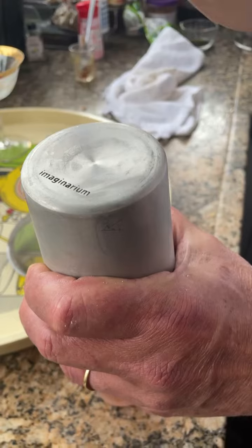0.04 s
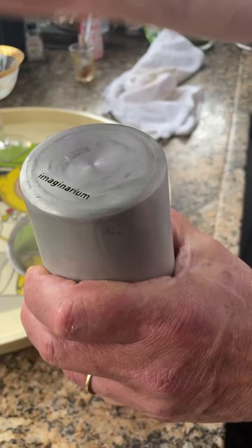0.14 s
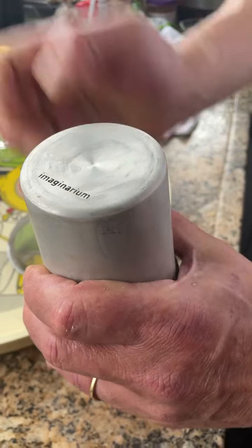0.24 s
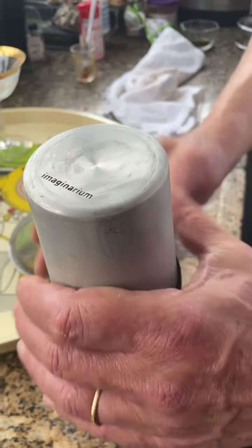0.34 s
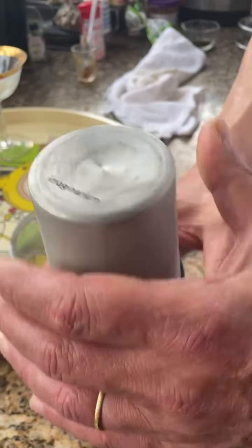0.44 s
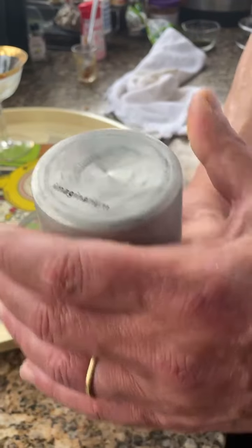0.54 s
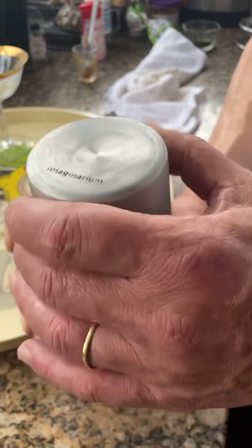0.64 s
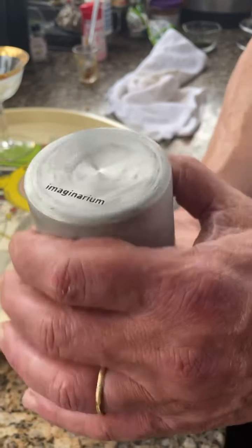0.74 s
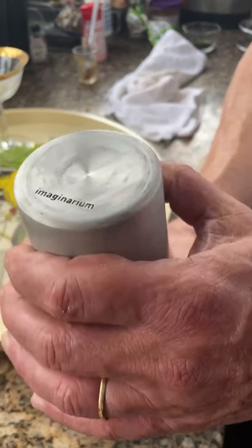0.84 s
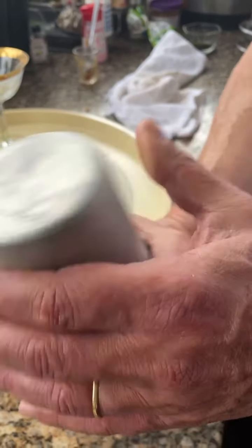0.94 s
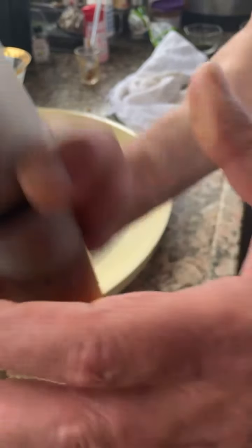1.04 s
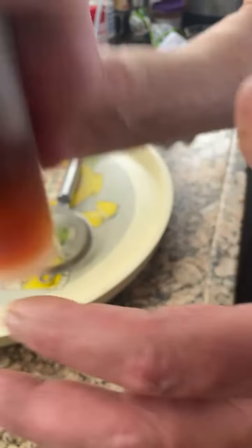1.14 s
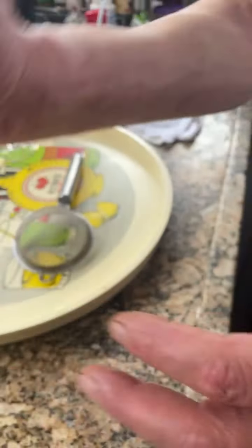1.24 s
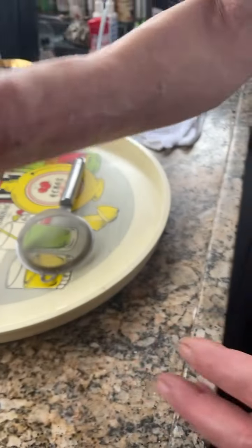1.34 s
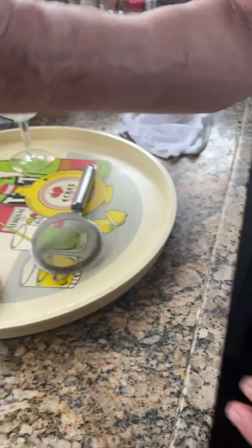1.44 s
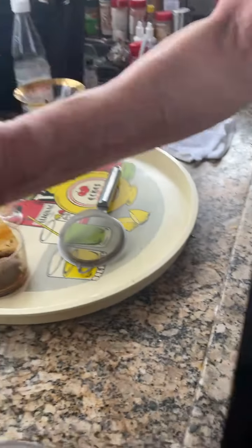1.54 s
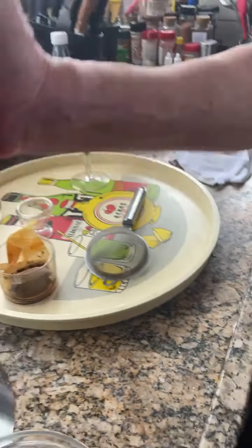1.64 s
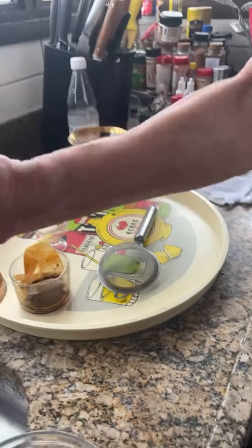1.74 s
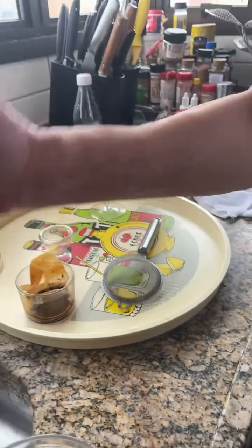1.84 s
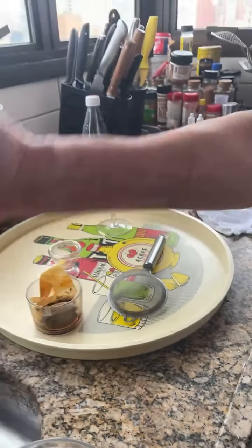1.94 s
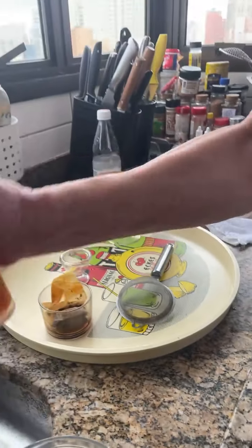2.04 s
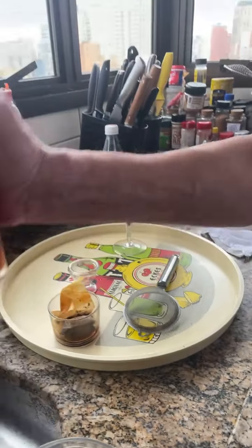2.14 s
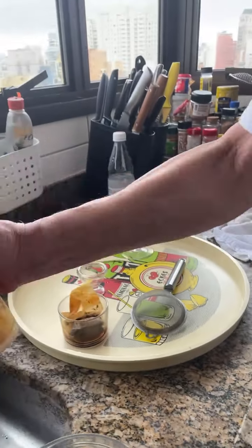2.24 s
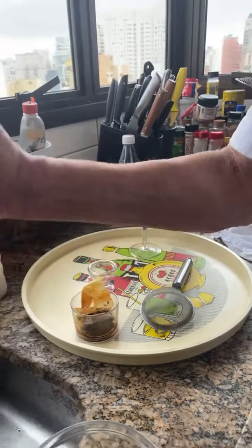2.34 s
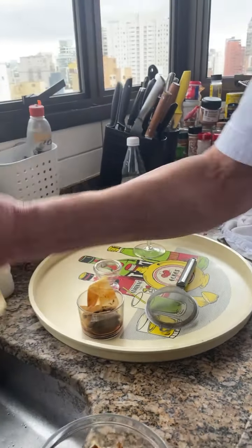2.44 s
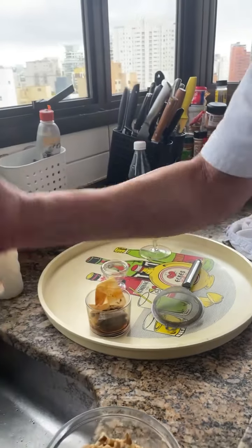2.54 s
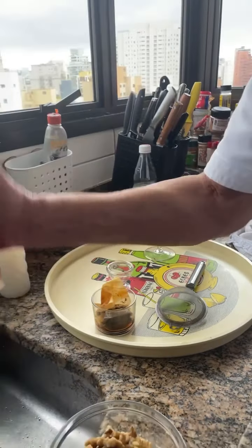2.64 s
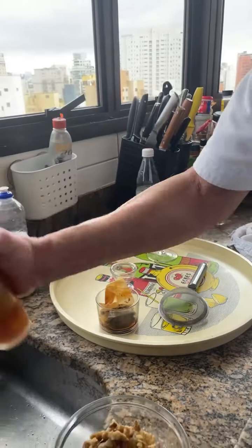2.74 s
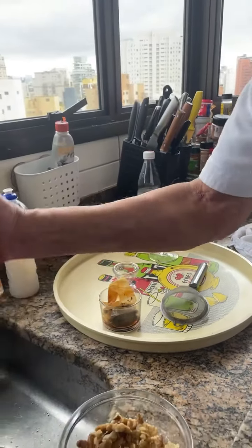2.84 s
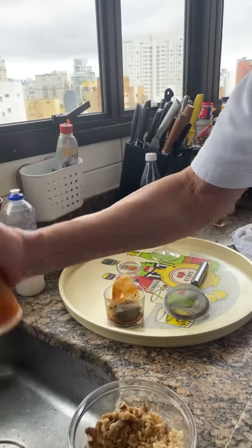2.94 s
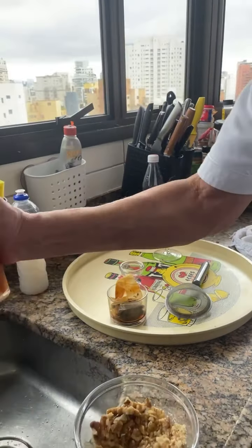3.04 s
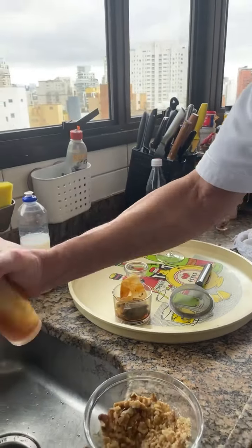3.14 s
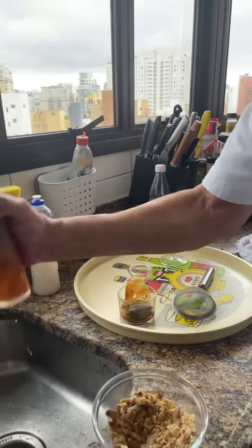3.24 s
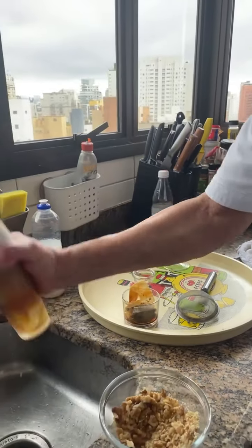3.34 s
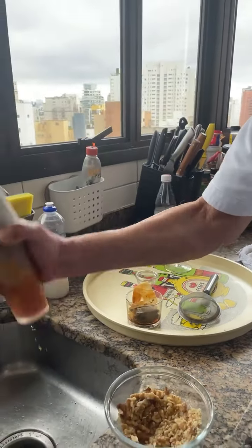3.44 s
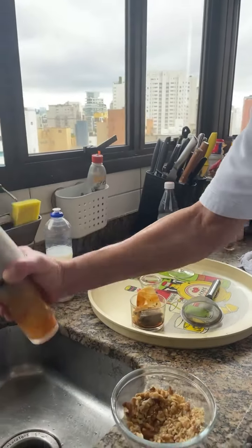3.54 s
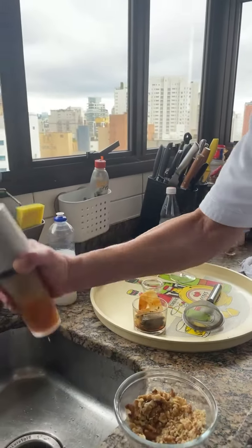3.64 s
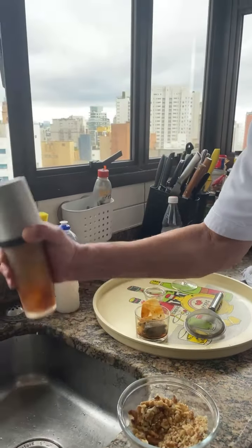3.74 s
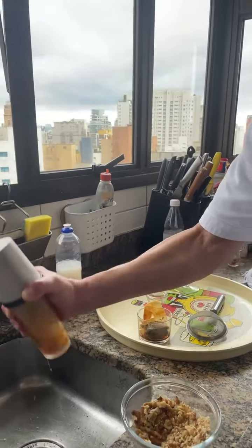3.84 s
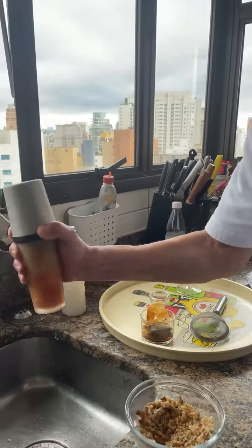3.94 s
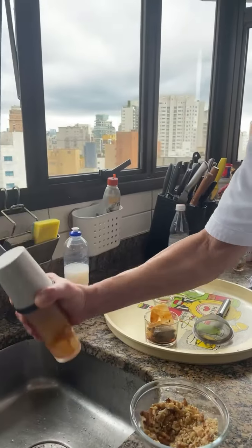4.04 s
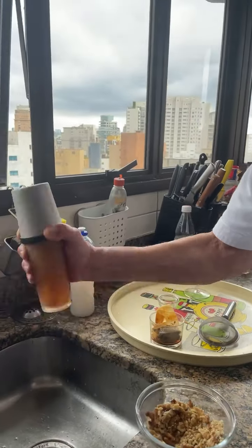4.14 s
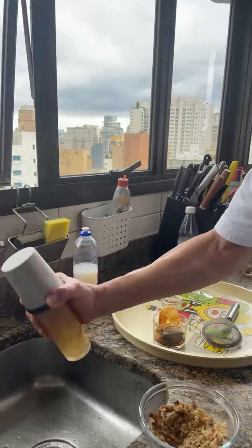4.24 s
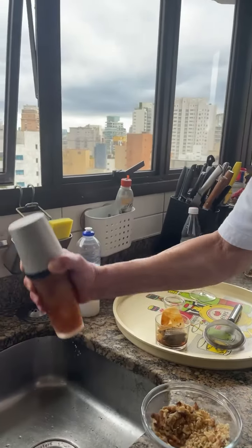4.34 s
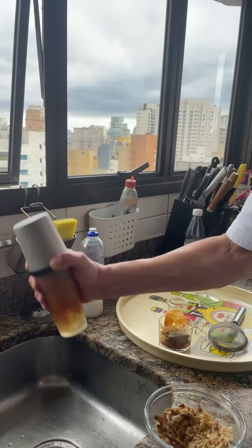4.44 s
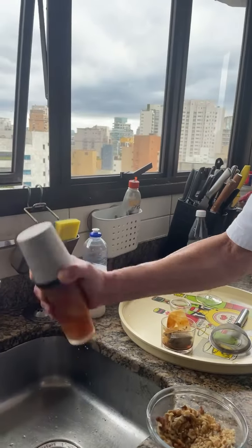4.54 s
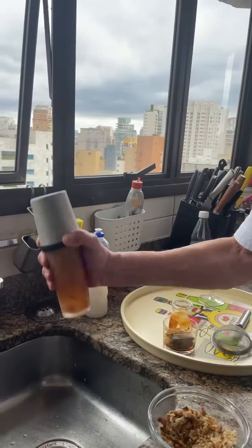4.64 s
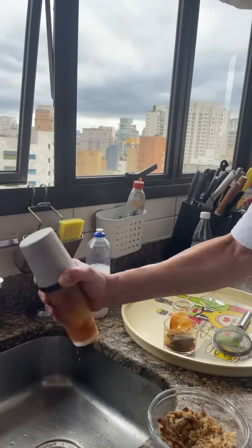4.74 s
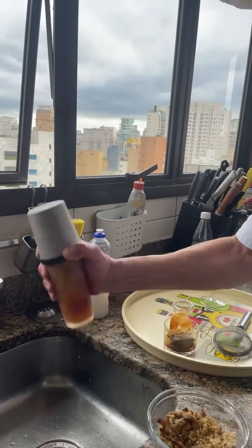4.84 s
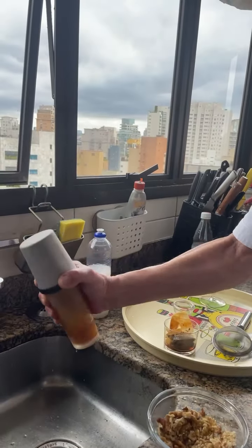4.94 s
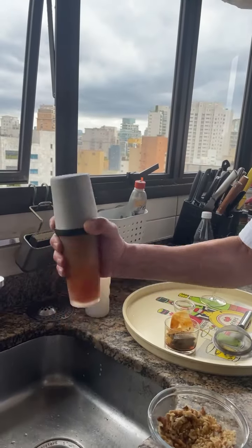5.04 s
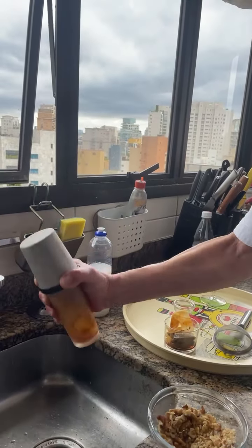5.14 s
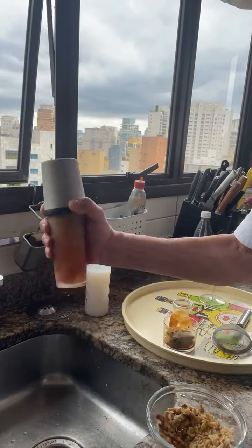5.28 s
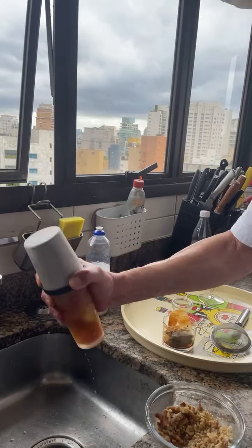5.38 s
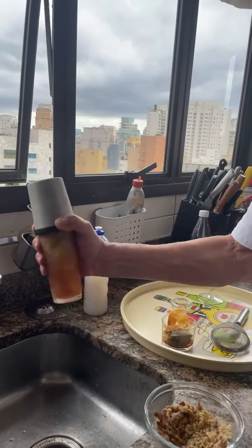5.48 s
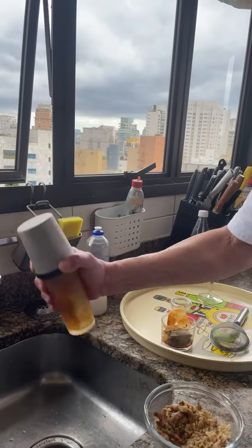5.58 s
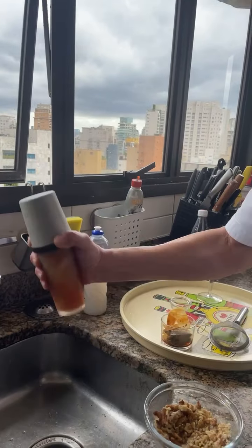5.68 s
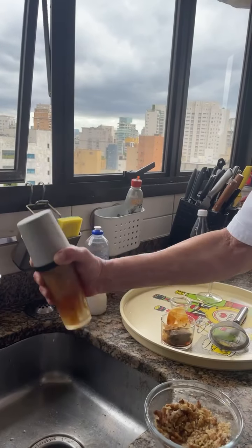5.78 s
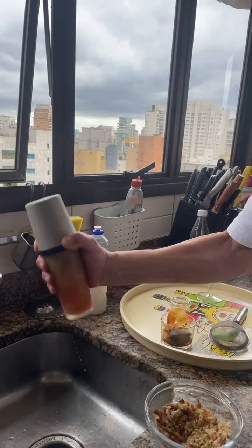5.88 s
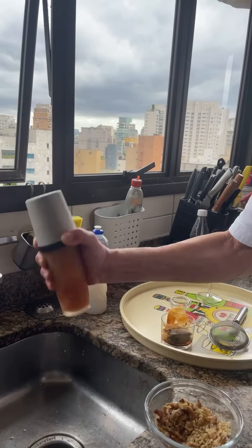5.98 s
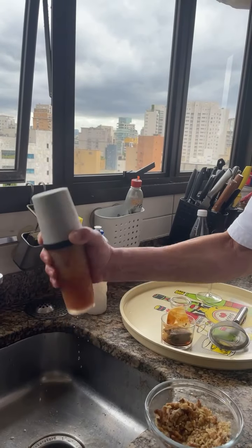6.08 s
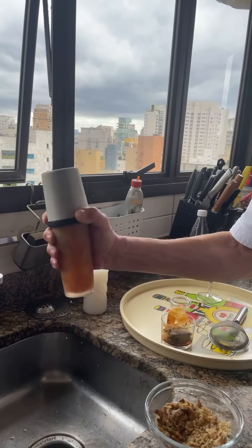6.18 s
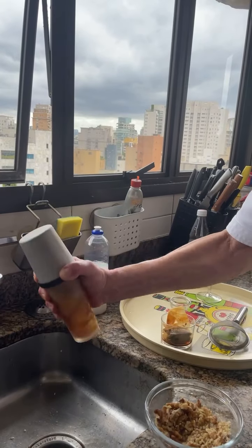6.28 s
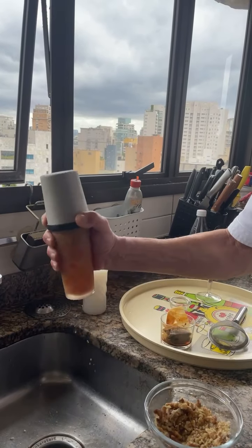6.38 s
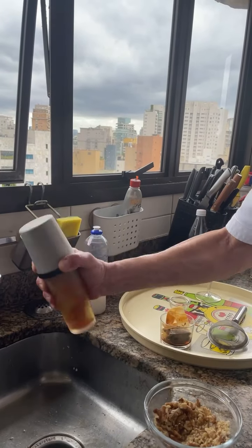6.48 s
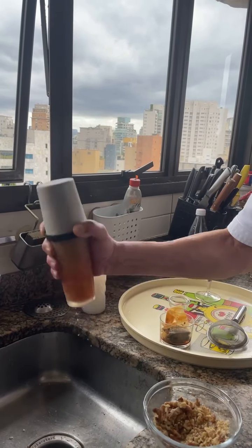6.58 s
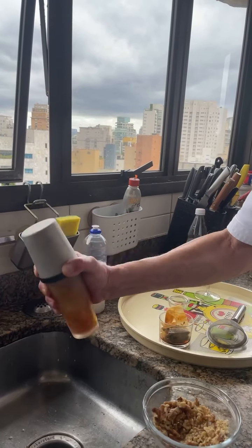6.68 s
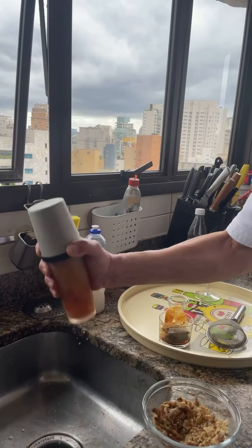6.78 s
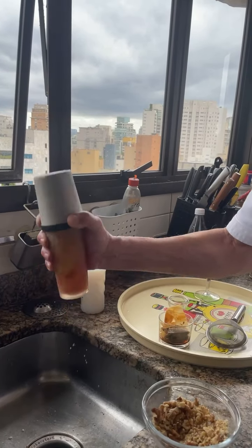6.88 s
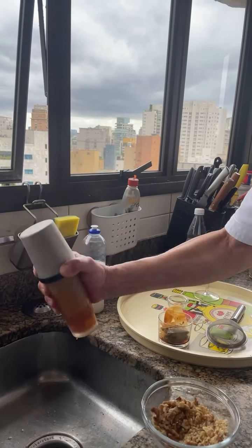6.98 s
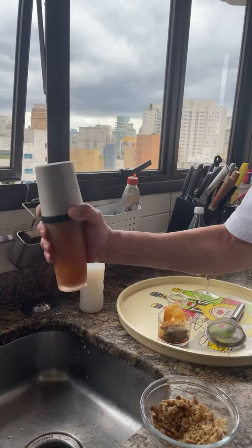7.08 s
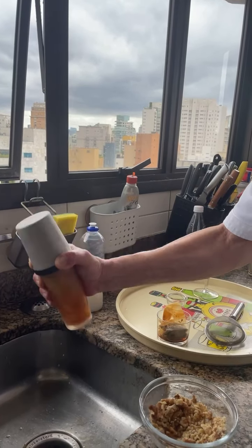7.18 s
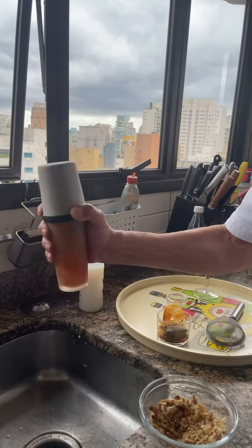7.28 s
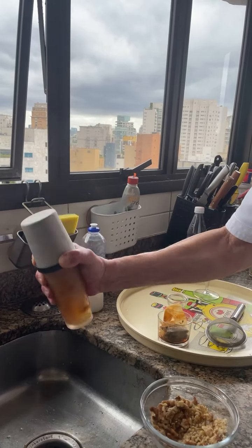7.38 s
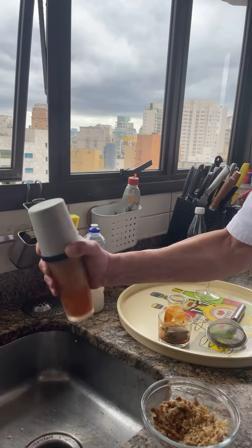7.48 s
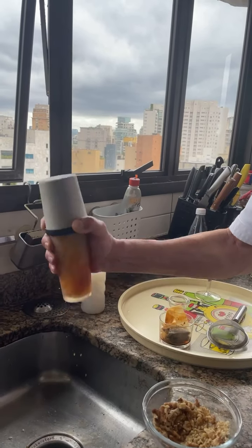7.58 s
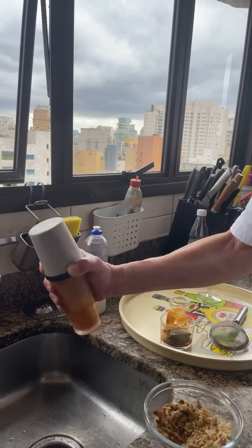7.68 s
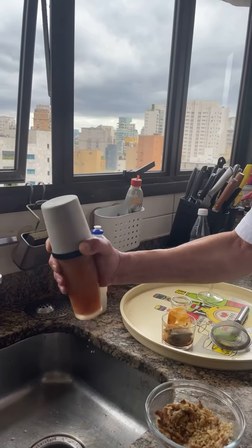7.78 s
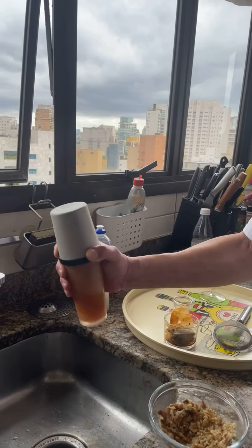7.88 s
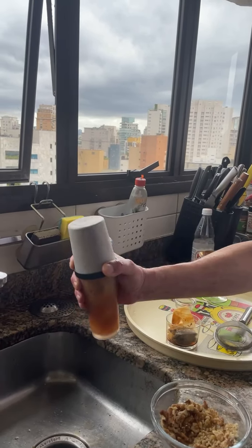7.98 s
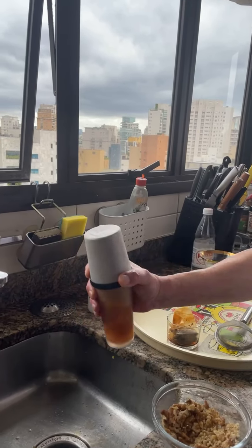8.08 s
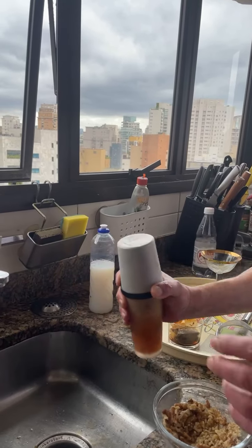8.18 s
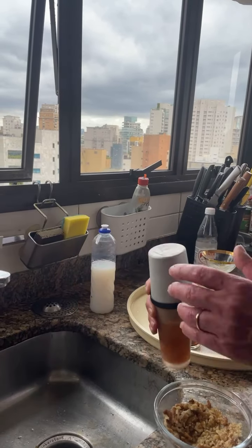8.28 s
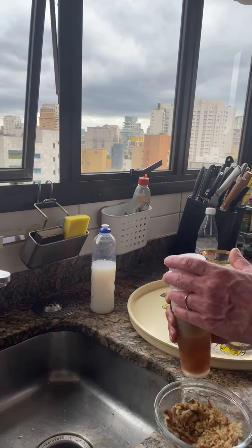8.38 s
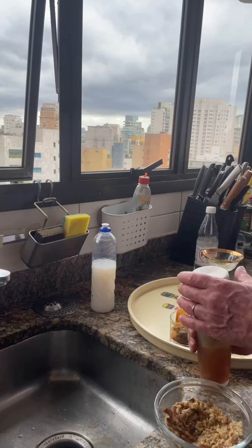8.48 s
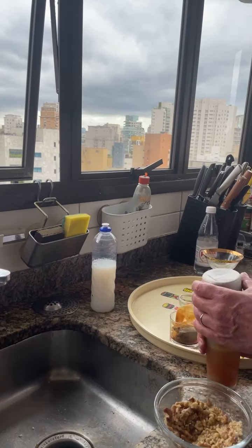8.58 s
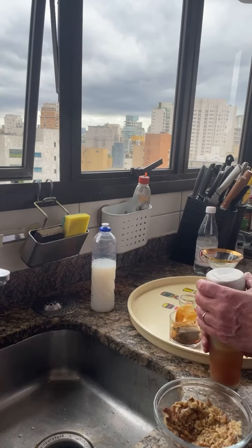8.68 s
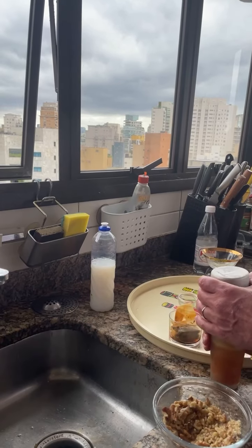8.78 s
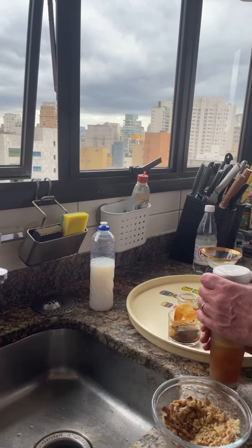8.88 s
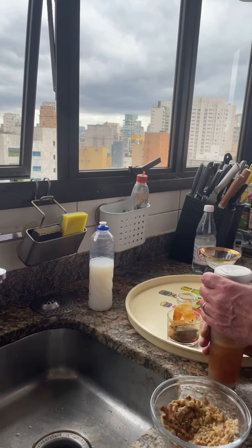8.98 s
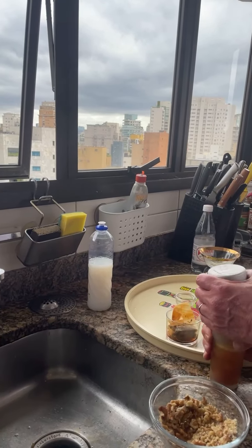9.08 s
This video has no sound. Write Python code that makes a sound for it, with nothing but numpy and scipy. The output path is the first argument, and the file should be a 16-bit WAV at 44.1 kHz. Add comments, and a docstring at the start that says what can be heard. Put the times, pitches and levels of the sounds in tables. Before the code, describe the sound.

Near microphone, lively kitchen echoes, low distant city hum. First a fading blow, soft hand knocks and thin high tinks on a metal and glass shaker. Then vigorous shaking for over six seconds: bright, clattering ice, wet splashes and little gurgles, surging about four or five times a second and varying in strength. Finally a few light scuffs, a hard set-down knock and hollow cup taps.

```python
"""First the ring of a blow dies away over town rumble from the window: a hard-walled kitchen, microphone near.
A two-part shaker (metal cup on a glass) is knocked shut by hand, shaken hard with ice and drink inside, then
set down on a stone counter. Ice lumps and small chips strike damped wall modes; noise drives the air that
glugs; knocks are short noise scuffs, taps and tinks struck resonances; decaying noise makes the echoes."""
import sys
import numpy as np
from scipy import signal
from scipy.fft import rfft, irfft
from scipy.io import wavfile

SR = 44100
rng = np.random.default_rng(int(sys.argv[2]) if len(sys.argv) > 2 else 0)


def transcribe(u):
    """Save the signal u as a 16-bit wav file named by the first command-line argument.

    u: samples, shape (n,) or (channels, n), limited to [-1, 1]; the rate is SR.
    q: integer samples, one column per channel.
    """
    v = np.clip(np.atleast_2d(u).T, -1, 1)
    q = np.round(v * 32767).astype(np.int16)
    wavfile.write(sys.argv[1], SR, q)


N = 402191

# Colour of the town through the window: [f/Hz, relative level per Hz/dB]
TOWN_COLOUR = [(15, -33), (25, -16), (53, -10.5), (82, -4), (130, -6), (242, -13), (263, -10), (516, -19),
               (680, -23), (911, -22), (1260, -27.5), (5880, -45), (6920, -47), (16000, -60)]
TOWN_DB = -46
HUM_HZ, HUM_DB = 57.3, -48.5

# Modes still ringing from the blow just before the start: [f/Hz, level/dB, t60/s]
BLOW_MODES = [(44.6, -25.5, 0.53), (221, -39, 0.97), (324, -43, 0.45), (617, -45, 0.35), (2330, -36, 0.39),
              (3580, -48, 0.47), (4010, -51, 0.49), (4930, -53, 0.35), (6700, -54, 0.25), (8500, -48, 0.32)]

# Glugs of the drink: [t of the peak/s, level/dB, hold at full level/s]
DRINK_GLUGS = [(.57, -43, .02), (.9, -50, .01), (1.34, -47, .03), (1.53, -44, 0.011), (1.78, -42.5, 0.017),
               (1.99, -46.5, 0.048), (2.47, -48, 0.018), (2.9, -48, 0.081), (3.3, -46.5, .05),
               (3.41, -42, .01), (4.31, -45, 0.024), (4.47, -43.5, 0.033), (4.72, -39.5, 0.056),
               (4.95, -40.5, 0.014), (5.62, -49, 0.092), (5.83, -44.5, 0.053), (6.05, -48, 0.086),
               (6.27, -42, 0.045), (6.52, -39, 0.02), (7.69, -48, .02)]
GLUG_RISE_DB_PER_S, GLUG_FALL_DB_PER_S = 286, 140

# Faint thin rings of glass or metal: [t/s, level/dB, f/Hz, t60/s]
THIN_RINGS = [(.245, -51, 8330, 0.044), (.255, -50, 3240, .1), (.525, -38.5, 3270, 0.14),
              (0.889, -39, 3260, 0.1), (0.914, -33, 3280, 0.053), (8.34, -47, 4500, 0.12)]

# Hollow taps on the air in the cup: [t/s, relative level/dB, f/Hz]
CUP_TAPS = [(8.018, -30, 377), (8.326, -27.5, 370), (8.676, -19.5, 381), (8.99, -21.5, 370),
            (9.044, -20.5, 418)]

# Hand, tray and counter knocks: [t/s, relative level/dB, low edge f/Hz, dull edge f/Hz, decay to 1/e/s]
CONTACT_KNOCKS = [(0, -32.5, 300, 3400, 0.057), (0.52, -40, 300, 3000, 0.021),
                  (0.544, -27, 280, 1800, 0.029), (0.655, -34, 250, 870, 0.035),
                  (0.88, -36, 300, 1480, 0.042), (.95, -39, 2400, 8900, 0.0024),
                  (.975, -32, 2000, 4900, 0.0079), (7.949, -34.5, 1800, 3200, 0.026),
                  (8.171, -35.5, 1510, 2830, 0.018), (8.412, -33, 1700, 3500, 0.016),
                  (8.533, -9.5, 740, 2570, 0.036), (8.533, -36, 2300, 4900, 0.0072),
                  (8.536, -51, 5000, 14100, 0.0037), (8.547, -26, 910, 3500, 0.0015),
                  (8.536, -21, 89.5, 460, 0.03), (9.028, -21.5, 140, 420, 0.036),
                  (9.039, -29, 485, 2040, 0.052)]
# Modes set ringing by the knocks: [f/Hz, relative level/dB, t60/s]
KNOCKED_MODES = [(588, -6.5, 0.22), (1290, -3, 0.037), (1750, -17, 0.064), (2150, -2, 0.034),
                 (3150, -5, 0.047), (4500, -14, .05)]

# Colour of the loaded shaker walls: [f/Hz, relative level per Hz/dB]
WALL_COLOUR = [(240, -48), (400, -11), (570, -29.5), (935, -18), (1420, -11), (1730, -1), (2250, 2),
               (3070, -0.5), (4880, 0), (5690, -4), (8240, -7), (9760, -22.5), (12700, -28), (14500, -25.5),
               (16000, -8)]
# The few wall modes that stand out: [f/Hz, relative level/dB, t60/s]
WALL_RINGS = [(1800, -9, 0.033), (2266, -16, 0.064), (2640, -5.5, 0.054), (3016, 4.5, 0.025),
              (3190, -9.5, 0.09), (3620, 5, 0.0094), (3950, -3.5, 0.063), (4230, -8.5, 0.058)]

# Turns of the stroke that set chips and drink sliding:
# [t/s, rattle level/dB, swell/s, weight below 1.5 kHz re rattle/dB, spray level above 9 kHz/dB]
STROKE_TURNS = [(1.258, -38, .02, -9, -52), (1.525, -23.5, 0.023, -30, -33), (1.705, -36, 0.024, -20, -30),
                (1.745, -25.5, 0.053, -14, -41), (1.91, -23.5, 0.038, -18, -19.5),
                (1.985, -25, 0.057, -13, -34), (2.108, -25, 0.17, -15, -20),
                (2.256, -22.5, 0.022, -17, -28), (2.393, -24.5, .1, -16, -25),
                (2.678, -29, 0.077, -11, -39), (2.85, -25.5, 0.1, -9.5, -25), (3.06, -30, 0.16, -10.5, -28),
                (3.28, -31, 0.033, -12, -43), (3.335, -33, 0.022, -8, -37), (3.367, -27.5, 0.05, -11, -38),
                (3.588, -24.5, 0.028, -11.5, -27), (3.668, -30.5, 0.042, -14, -30),
                (3.774, -25, .03, -13, -40), (3.82, -24, 0.027, -11, -29), (3.95, -33, 0.049, -12, -48),
                (3.998, -25, 0.11, -12.5, -26.5), (4.17, -30.5, 0.048, -11, -32),
                (4.213, -25, 0.11, -8.5, -27), (4.285, -26, 0.054, -15, -34), (4.45, -31.5, 0.11, -14, -30),
                (4.59, -33, 0.066, -13, -30), (4.667, -28, 0.097, -9.5, -37), (4.93, -29, 0.035, -7, -32),
                (5.015, -30, 0.075, -20, -52), (5.088, -27, 0.023, -27, -36),
                (5.134, -20, 0.026, -15.5, -32), (5.285, -25, 0.14, -13.5, -26),
                (5.51, -32, 0.03, -12, -38), (5.599, -25.5, 0.059, -16.5, -36),
                (5.76, -30, 0.099, -13.5, -42), (5.845, -32.5, 0.045, -20, -34),
                (5.955, -34.5, 0.044, -14, -36), (6.041, -24, 0.017, -13.5, -40),
                (6.188, -34.5, .03, -18, -43), (6.257, -24.5, 0.039, -14.5, -34),
                (6.46, -38.5, 0.018, 0, -39), (6.5, -28.5, 0.044, -13, -42), (6.68, -28.5, 0.094, -13, -41),
                (6.845, -40, .02, -14, -41), (6.931, -29.5, 0.077, -17, -37), (7.11, -38, 0.019, -22, -40),
                (7.162, -28.5, 0.08, -11.5, -36), (7.275, -29.5, 0.027, -15, -30),
                (7.347, -25, 0.09, -11.5, -42), (7.45, -29, 0.044, -17, -34),
                (7.556, -23.5, 0.045, -16, -32), (7.64, -24, 0.048, -18, -44), (7.9, -54, .01, -18, -48)]
# After a turn: jump, swell, die away; left alone, the contents settle ever faster
RISE_S, SWELL_DB, FALL_DB_PER_S, SPRAY_FALL_DB_PER_S = 0.03, 4, 105, 92
SETTLE_DB_PER_S2 = 124
LEAD_S = 0.015   # small chips start ahead of the turn's listed time
USUAL_HZ, FOLLOW = 3300, 0.41   # the rattle leans from its usual pitch towards that of the last crash

# Contents shifting while the shaker is only held:
# [t/s, level/dB, weight below 1.5 kHz re level/dB, edge above 9 kHz re level/dB, brightest f/Hz]
HELD_SHIFTS = [(.2, -63.5, -7, -4, 3000), (.45, -67, -2, -14, 2400), (.56, -54, -5, -7, 3000),
               (.77, -44.5, -35, -7, 4000), (1.12, -61.5, -1, -17, 2460), (1.24, -52, -12, -8, 4000),
               (1.45, -47.5, -8.5, -12, 3800), (7.85, -40, -14, -22, 3300), (8.0, -57.5, 0, -12, 2300),
               (8.22, -54.5, -6, -16, 2000), (8.35, -51.5, -3.5, -6, 3800), (8.5, -52.5, -9, -12, 2000),
               (8.56, -50, -1, -30, 2000), (8.75, -52, -9, -30, 2230), (8.95, -60.5, 3, -15, 2420),
               (9.07, -52, 4, -20, 1950)]

# Ice crashes: [t/s, relative level/dB, brightest f/Hz, weight below 1.5 kHz/dB, edge above 9 kHz/dB,
# lead of the first lump/dB]
ICE_CRASHES = [(1.2374, -28, 4500, -24, -31, 2), (1.252, -26, 4100, -30, -27, 6),
               (1.2586, -16.5, 4200, -40, -24, 19), (1.2735, -13.5, 4600, -19.5, -41, 9),
               (1.3495, -18, 2150, -15, -54, -3), (1.384, -18.5, 3860, -24, -52, 26),
               (1.4245, -25.5, 4270, -13, -18, 11), (1.4664, -18, 4750, -32, -25, 24),
               (1.4848, -24, 4910, -8, -19, 2), (1.5122, -10, 4960, -30, -26, 9),
               (1.5291, 2, 4680, -20.5, -26.5, 9), (1.7266, -19, 4640, -24, -32, 11),
               (1.741, -14.5, 4700, -20, -28, 6), (1.7493, -5.5, 4860, -31, -24, 5),
               (1.777, -7, 4180, -5, -24, 13), (1.8333, -16, 4200, -12, -25, -4),
               (1.8982, -15.5, 4240, -27, -31, 6), (1.9127, -5, 3200, -48, -17.5, -20),
               (1.9557, -10, 2880, -17, -26, -2), (1.986, -8, 5170, -6, -19, 3),
               (2.016, -7.5, 3930, -13, -21.5, -8), (2.0712, -10.5, 3800, -27, -34, 8),
               (2.0845, -8.5, 4940, -36, -22, -6), (2.1088, -2.5, 4240, -40, -19.5, -5),
               (2.1771, -4.5, 3160, -21, -30, 3), (2.2579, -3, 3950, -18.5, -27, -6),
               (2.3941, -2.5, 2850, -22, -18.5, 8), (2.4477, -6.5, 3730, -21, -19.5, -6),
               (2.5042, -7.5, 2960, -17.5, -38, 7), (2.609, -18.5, 3000, -31, -24, -2),
               (2.6755, -29, 2960, -8, -12, 10), (2.7, -15.5, 3980, -19, -19, 8),
               (2.7266, -15, 3800, -9, -17, 17), (2.7987, -18.5, 3580, -24, -39, 6),
               (2.8303, -11.5, 3570, -19, -39, 13), (2.8497, -16, 4170, -7, -10.5, -3),
               (2.876, -8.5, 3060, -34, -38.5, 3), (2.9728, -14, 3070, -9, -38, 4),
               (3.0832, -5, 3340, -27, -26, 15.5), (3.1437, -17.5, 3820, -8, -14.5, 10),
               (3.2815, -13.5, 3750, -19, -18.5, 6), (3.34, -19.5, 3260, -28, -18, -2),
               (3.368, -4, 3400, -19.5, -32, -4), (3.505, -13.5, 3700, -21, -36, -6),
               (3.5883, -12.5, 3700, -15, -40, 8), (3.6691, -6, 3940, -57, -38, 20),
               (3.775, -8.5, 2950, -32, -31, 4), (3.8204, -7.5, 3360, -32, -24.5, 1),
               (3.9533, -18.5, 2720, -15, -36, -3), (3.998, -3.5, 2700, -20.5, -34, 8.5),
               (4.217, -11.5, 2950, -3, -24, 3), (4.285, -6.5, 2850, -22, -34, 5),
               (4.307, -13, 5530, -30, -20.5, 10), (4.451, -29, 2900, -26, -4, 4),
               (4.513, -14.5, 3300, -14, -22, -1), (4.591, -24, 4000, -26, -10.5, -2),
               (4.627, -14.5, 2950, -23, -23, 0), (4.6678, -10.5, 2900, -7, -20.5, 1),
               (4.7035, -13, 3190, -23, -27, 8), (4.728, -11, 3900, -28, -27, 7),
               (4.818, -16, 3920, -36, -22, -1), (4.866, -15.5, 3840, -17, -21, 4),
               (4.9298, -12.5, 3620, 4, -23, 7), (5.015, -11.5, 3300, -36, -41, -1),
               (5.091, -3, 3300, -64, -30, 9), (5.29, -8, 3020, -46, -16.5, -1),
               (5.3994, -14, 3700, -22, -21, 6), (5.6127, -15.5, 3520, -30, -27, 9),
               (5.76, -20, 2140, -30, -41, 8), (5.7864, -22.5, 3050, -10, -40.5, 2),
               (5.8667, -17.5, 4230, -13, -22, 13), (5.959, -18.5, 2100, -17, -33, 1),
               (6.0292, -22.5, 3030, -17, -18, 8), (6.0457, -5, 5530, -19.5, -25, -3),
               (6.1891, -14, 3000, -27, -25, -5), (6.2572, -11, 3040, -26, -29, -1),
               (6.284, -11, 3660, -28, -36, 3), (6.5094, -13.5, 1740, -35, -26, 5),
               (6.563, -15, 3770, -32, -56, -1), (6.646, -22, 4080, -24, -22, 2),
               (6.6836, -19.5, 1960, -34, -39, 16), (6.7337, -12.5, 3960, -17, -23, 9),
               (6.759, -13.5, 3970, -17, -15.5, 4), (6.933, -25.5, 3030, -30, -34, -6),
               (6.954, -16.5, 2380, -5, -24, 0), (7.008, -15.5, 4700, -19, -22, 5),
               (7.1644, -20, 3220, -27, -40, 5), (7.279, -16.5, 3950, -33, -18, -3),
               (7.3494, 1, 3220, -17, -29, 15.5), (7.5588, -0.5, 3740, -41, -22.5, 12),
               (7.6415, -7.5, 4100, -23, -21, -5), (7.6943, -6.5, 3910, -29, -24, -8)]
USUAL_WEIGHT_DB, USUAL_EDGE_DB = -34.5, -33.5   # references for the weight and edge columns

# Decay of the kitchen: [f/Hz, t60/s]
KITCHEN_DECAY = [(200, 0.66), (1500, 0.46), (4000, 0.51), (9000, 0.4), (16000, 0.61)]
STROKES_PER_S = 2.2
CUTOFF_HZ = 15980


def amp(db):
    """Convert dB to gain."""
    return 10 ** (np.asarray(db) / 20)


def rms_one(x):
    """Scale to rms 1."""
    return x / np.sqrt(np.mean(x ** 2) + 1e-20)


def in_time(rows):
    """Interpolate the columns of a time table at every sample."""
    s, *columns = np.transpose(rows)
    return [np.interp(np.arange(N) / SR, s, column) for column in columns]


def at_hz(points, hz):
    """Read a table on a log-frequency axis."""
    table_hz, value = np.transpose(points)
    return np.interp(np.log(np.maximum(hz, 1)), np.log(table_hz), value)


def ring(clicks, hz, t60):
    """A damped mode: a unit click starts a sine whose envelope begins at 1 and falls 60 dB in t60."""
    r, w = amp(-60 / (t60 * SR)), 2 * np.pi * hz / SR
    tiny = 1e-18   # keeps the filter clear of denormal numbers
    return signal.lfilter([0, np.sin(w)], [1, -2 * r * np.cos(w), r * r], clicks + tiny)


def town():
    """Distant town: steady coloured noise, rumble and hiss, with a faint mains hum."""
    colour = amp(at_hz(TOWN_COLOUR, np.fft.rfftfreq(N, 1 / SR)))
    noise = irfft(rfft(rng.standard_normal(N)) * colour, N)
    hum = np.sin(2 * np.pi * HUM_HZ * np.arange(N) / SR)
    return amp(TOWN_DB) * rms_one(noise) + amp(HUM_DB) * hum


def last_blow():
    """Modes already ringing at the first instant die away exponentially."""
    t = np.arange(N) / SR
    return sum(amp(db - 60 * t / t60) * np.cos(2 * np.pi * hz * t) for hz, db, t60 in BLOW_MODES)


def glug(hz, t60):
    """Sloshing drives the trapped air at its resonance; every glug rises fast, holds and fades."""
    s, peak_db, hold_s = np.transpose(DRINK_GLUGS)[:, :, None]
    t = np.arange(N) / SR - s
    rise_db = GLUG_RISE_DB_PER_S * np.minimum(t, 0)
    fall_db = GLUG_FALL_DB_PER_S * np.maximum(t - hold_s, 0)
    level_db = peak_db + rise_db - fall_db
    air = ring(ring(rng.standard_normal(N), hz, t60), hz, t60)
    return amp(level_db.max(axis=0)) * rms_one(air)


def tinks():
    """Single thin modes of glass or metal, lightly touched."""
    out = np.zeros(N)
    for s, level_db, hz, t60 in THIN_RINGS:
        click = amp(level_db) * (np.arange(N) == int(s * SR))
        out += ring(click, hz, t60)
    return out


def taps(push_s, t60):
    """A soft push of a few ms sets the air in the cup ringing briefly."""
    out = np.zeros(N)
    for s, level_db, hz in CUP_TAPS:
        click = amp(level_db) * (np.arange(N) == int(s * SR))
        push = ring(click, hz, push_s)
        out += ring(push, hz, t60) * 16 / (push_s * SR)   # a longer push is made no louder
    return out


def knocks():
    """A dying scuff of contact noise in the band that the blow excites, heard directly and through modes."""
    force = np.zeros(N + SR)
    t = np.arange(SR // 4) / SR
    for s, level_db, low_hz, dull_hz, length in CONTACT_KNOCKS:
        scuff = rng.standard_normal(len(t)) * np.exp(-t / length)
        band = signal.butter(3, [low_hz, dull_hz], "band", fs=SR, output="sos")
        level = amp(level_db) * np.sqrt(6000 / (dull_hz - low_hz))   # makes up for narrow bands
        start = int(s * SR)
        force[start:start + len(t)] += level * signal.sosfilt(band, scuff)
    force = force[:N]
    rung = sum(amp(db) * ring(force, hz, t60) for hz, db, t60 in KNOCKED_MODES)
    return force + amp(-38.0) * rung


def weight(hz):
    """Share 0-1 of a mode that belongs to the low thud of the load."""
    return np.clip(np.log2(2000 / hz), 0, 1)


def edge(hz):
    """Share 0-1 of a mode that belongs to the sharp treble edge."""
    return np.clip(np.log2(hz / 6500), 0, 1)


def focus(hz, bright_hz, focus_db):
    """Modes near the pitch that the ice favours at that moment are struck harder (dB)."""
    return focus_db * np.exp(-(np.log2(hz / bright_hz) / 0.32) ** 2)


def shell_modes(cycles):
    """Dense, heavily damped wall modes under the wall colour, plus the few that stand out."""
    hz = np.geomspace(450, 15700, 46)
    t60 = cycles / hz / (1 + 1.23 * edge(hz))   # the treble ones overlap
    spacing_db = 10 * np.log10(hz / 3000)   # wider-spaced modes each carry more of the colour
    decay_db = 10 * np.log10(t60 * 100)   # longer rings need less drive
    level_db = at_hz(WALL_COLOUR, hz) + spacing_db - decay_db
    return list(zip(hz, level_db, t60)) + [(f, level - 8.0, t) for f, level, t in WALL_RINGS]


def surges(s, peak_db, swell_s, swell_db, fall_db_per_s):
    """Each turn jumps up, swells to its peak and dies away; gives the loudest level (dB) and whose it is."""
    step = 64   # samples per level update
    t = np.arange(0, N, step)[:, None] / SR - (s - LEAD_S)
    swell_s = np.maximum(swell_s, .001)
    after = np.maximum(t - swell_s, 0)
    swell = -swell_db * np.clip(1 - t / swell_s, 0, 1)
    fall = -fall_db_per_s * after - SETTLE_DB_PER_S2 * after ** 2
    jump = 20 * np.log10(np.clip(t / RISE_S, 1e-4, 1))
    level = peak_db + swell + fall + jump
    return np.repeat(level.max(axis=1), step)[:N], np.repeat(level.argmax(axis=1), step)[:N]


def rattle(per_s, uneven_db, spray):
    """Many small uneven contacts strike all the wall modes; fine spray adds a smooth hiss to the treble ones."""
    s, peak_db, swell_s, weight_db, spray_db = np.transpose(STROKE_TURNS)
    level_db, turn = surges(s, peak_db, swell_s, SWELL_DB, FALL_DB_PER_S)
    top_db, _ = surges(s, spray_db, 0 * s, 0, SPRAY_FALL_DB_PER_S)
    held_db, held_weight_db, held_edge_db, held_hz = in_time(HELD_SHIFTS)

    at = np.flatnonzero(rng.random(N) < per_s / SR)
    crash_s, _, crash_hz = np.transpose(ICE_CRASHES)[:3]
    last = np.maximum(np.searchsorted(crash_s, at / SR) - 1, 0)
    shaken_hz = USUAL_HZ * (crash_hz[last] / USUAL_HZ) ** FOLLOW
    bright_hz = np.where((level_db > held_db)[at], shaken_hz, held_hz[at])
    size = amp(uneven_db * np.minimum(rng.exponential(1, len(at)), 4))
    hiss = spray * rng.standard_normal(N)

    low, body, top = np.zeros((3, N))
    for hz, mode_db, t60 in shell_modes(cycles=61):
        clicks = edge(hz) * hiss
        strike = size * rng.standard_normal(len(at))
        clicks[at] += strike * amp(focus(hz, bright_hz, focus_db=4.0))
        rung = amp(mode_db) * ring(clicks, hz, t60)
        low += weight(hz) * rung
        body += (1 - edge(hz) - weight(hz)) * rung
        top += edge(hz) * rung

    # shaken or held, whichever is louder, in each band
    body_db = np.maximum(level_db, held_db)
    low_db = np.maximum(level_db + weight_db[turn], held_db + held_weight_db)
    top_db = np.maximum(top_db, held_db + held_edge_db)
    return amp(body_db) * rms_one(body) + amp(low_db) * rms_one(low) + amp(top_db) * rms_one(top)


def crashes(spread_s, splash_s, splash_db, count=20):
    """A leading lump, then a cluster (spread wider in big crashes); each mode is struck in its own way."""
    s, peak_db, bright_hz, weight_db, edge_db, lead_db = np.transpose(ICE_CRASHES)
    order = rng.exponential(1, (len(s), count)) * (np.arange(count) > 0)   # the first lump has no delay
    spread = spread_s * amp(.3 * peak_db)
    at = np.minimum(((s[:, None] + order * spread[:, None]) * SR).astype(int), N - 1)
    size = amp(rng.normal(0, 0.97, at.shape) - 0.6 * order)   # late lumps land softer
    size[:, 0] = amp(lead_db)
    size /= np.sqrt(np.mean(size ** 2, axis=1, keepdims=True))

    # drink thrown against the wall hisses on in the treble modes after the crash
    starts = np.zeros(N)
    starts[at[:, 0]] = amp(peak_db + edge_db - USUAL_EDGE_DB + splash_db)
    fade = signal.lfilter([1], [1, -np.exp(-1 / (splash_s * SR))], starts + 1e-18)
    splash = fade * rng.standard_normal(N)

    thud_db = np.minimum(weight_db, -9) - USUAL_WEIGHT_DB
    sharp_db = edge_db - USUAL_EDGE_DB - 0.5
    out = np.zeros(N)
    for hz, level_db, t60 in shell_modes(cycles=56):
        clicks = amp(level_db) * edge(hz) * splash
        tilt_db = thud_db * weight(hz) + sharp_db * edge(hz)
        level = amp(peak_db + focus(hz, bright_hz, focus_db=9.5) + tilt_db + level_db)
        np.add.at(clicks, at, level[:, None] * size * rng.standard_normal(at.shape))
        out += ring(clicks, hz, t60)
    return amp(-28) * out


def kitchen(x, first_s):
    """Dense reflections: noise that dies band by band, fading in from first_s to twice that delay."""
    t = np.arange(SR) / SR
    edges = 90 * 2 ** np.arange(0, 8, .5)   # half-octave bands
    echoes = 0
    for low, high in zip(edges, edges[1:]):
        band_filter = signal.butter(2, [low, high], "band", fs=SR, output="sos")
        band = signal.sosfilt(band_filter, rng.standard_normal(SR))
        echoes = echoes + band * amp(-60 * t / at_hz(KITCHEN_DECAY, np.sqrt(low * high)))
    echoes = echoes * np.clip(t / first_s - 1, 0, 1)
    return signal.fftconvolve(x, echoes / np.sqrt(np.sum(echoes ** 2)))[:N]


def scene():
    """Shaker and knocks near the microphone in the kitchen, over the distant town."""
    ice = crashes(spread_s=.009, splash_s=0.016, splash_db=-9.5) + rattle(per_s=1200, uneven_db=2.5, spray=0.37)
    # a small shell radiates no bass; a gentle slope softens the top of the ice sound
    ice = signal.sosfilt(signal.butter(3, 600, "high", fs=SR, output="sos"), ice)
    ice = signal.sosfilt(signal.butter(1, 10500, fs=SR, output="sos"), ice)
    near = ice + knocks()
    hollow = taps(push_s=0.0049, t60=0.083) + tinks()
    send = near + amp(-12) * hollow
    # the shaker swings between two places, each with echoes of its own
    swing = np.pi * STROKES_PER_S * np.arange(N) / SR
    one_place = kitchen(send * np.cos(swing), first_s=0.0051)
    other_place = kitchen(send * np.abs(np.sin(swing)), first_s=0.011)
    room = amp(-8.0) * (one_place + other_place)
    return (near + hollow + room + glug(hz=319, t60=0.015) + last_blow() + town())[None]


def record(dry):
    """The microphone hisses faintly at the top; peaks are rounded, the top is cut."""
    hiss = signal.sosfilt(signal.butter(6, 13800, "high", fs=SR, output="sos"), rng.standard_normal(N))
    dry = dry + amp(-67) * hiss
    rounded = 1.218 * np.tanh(dry / 1.056)
    return signal.sosfilt(signal.cheby2(20, 60, CUTOFF_HZ, fs=SR, output="sos"), rounded)


dry = scene()
out = record(dry)
transcribe(out)
```